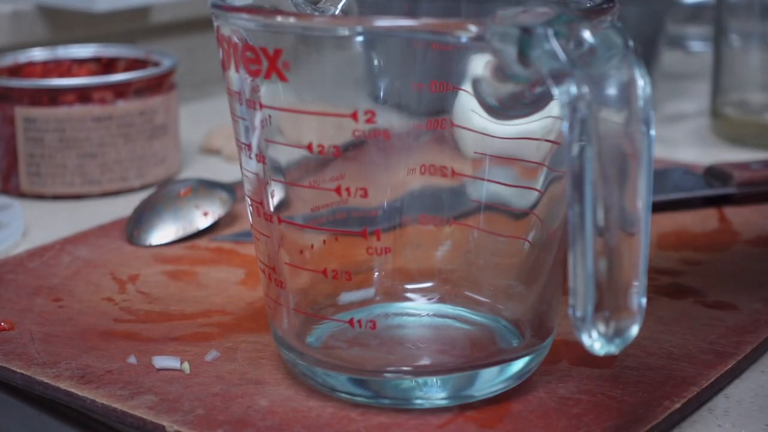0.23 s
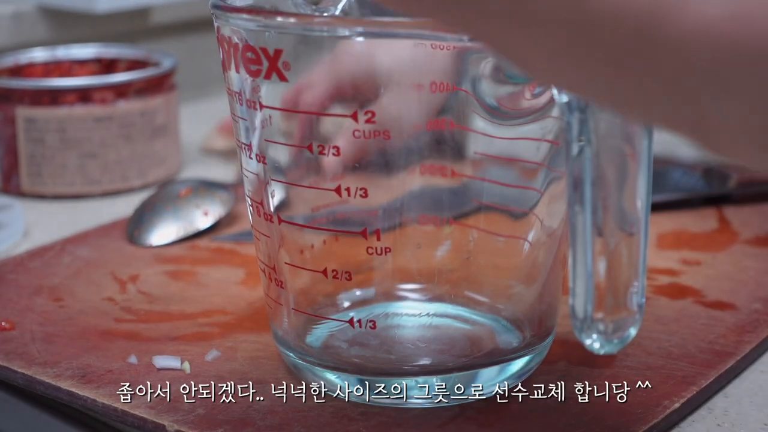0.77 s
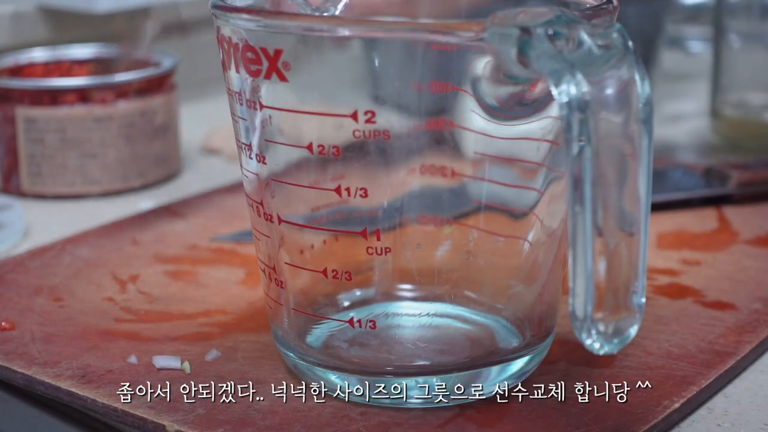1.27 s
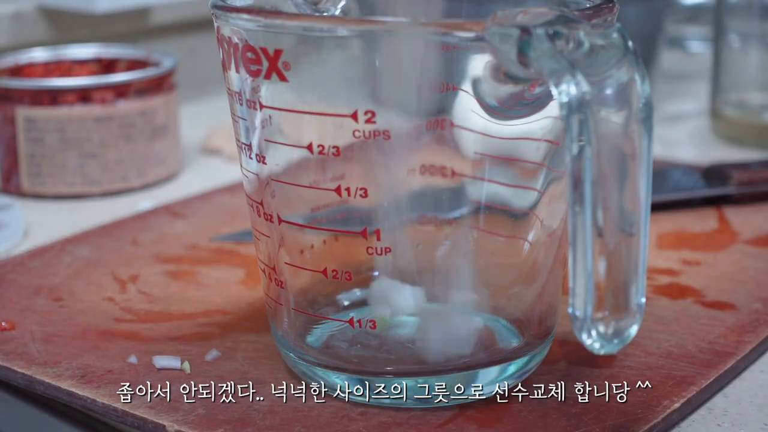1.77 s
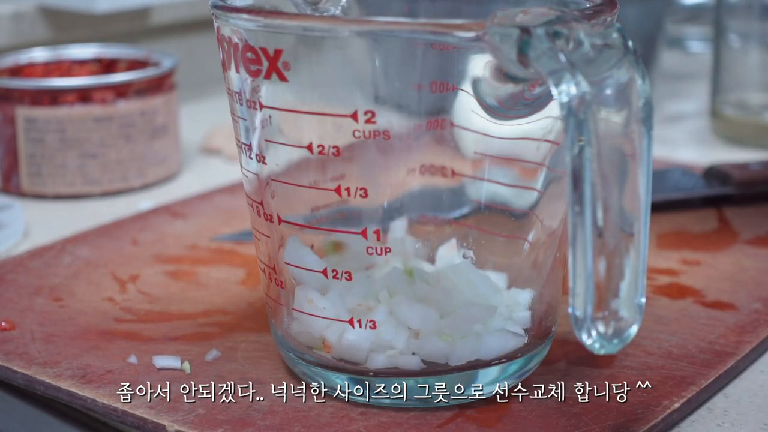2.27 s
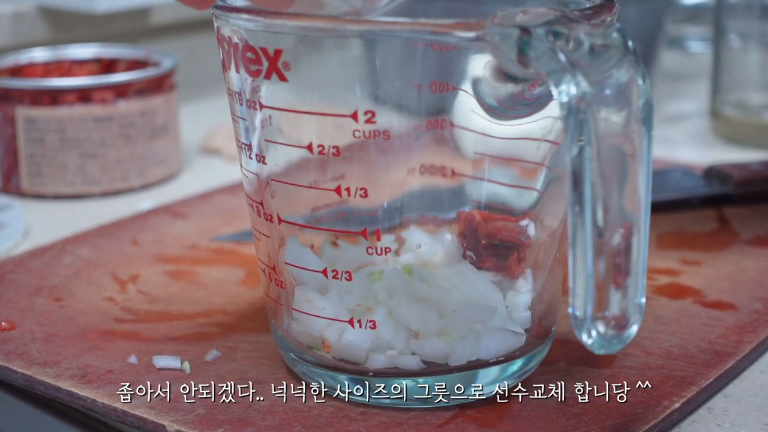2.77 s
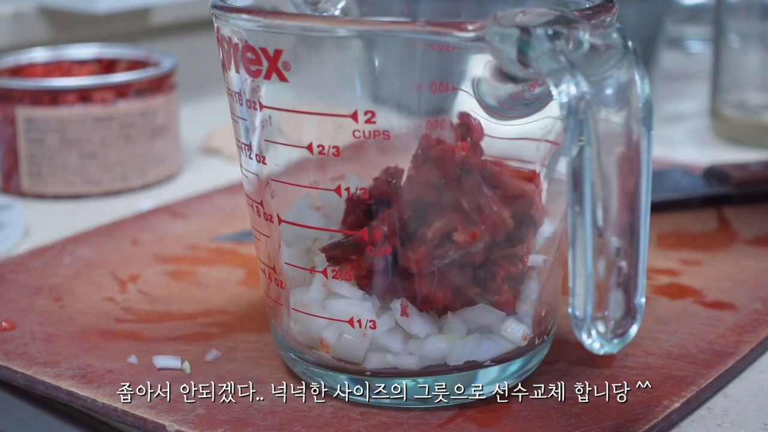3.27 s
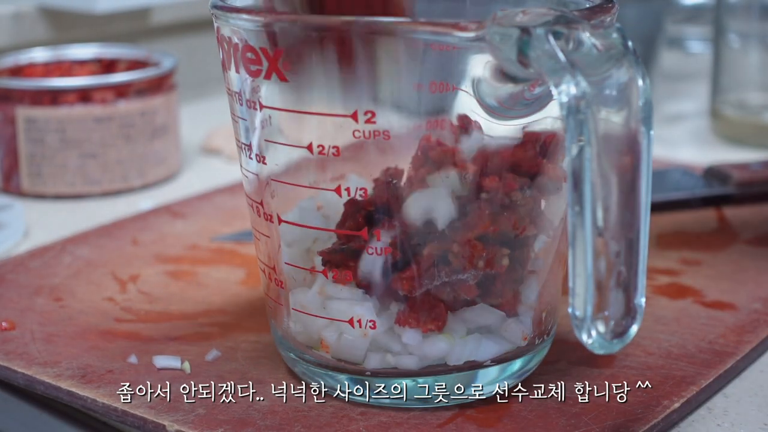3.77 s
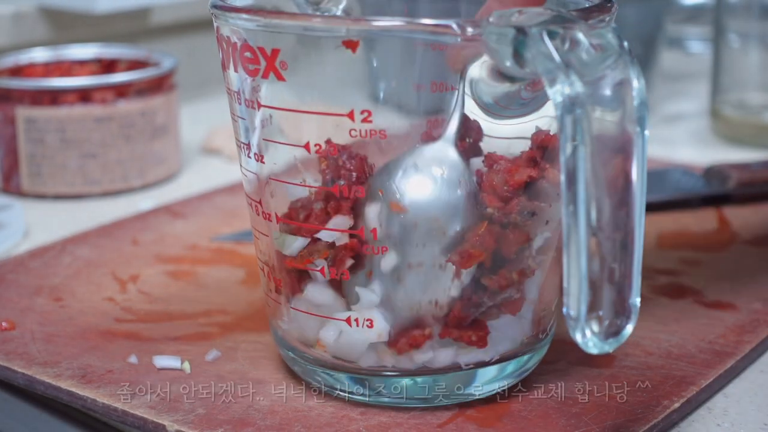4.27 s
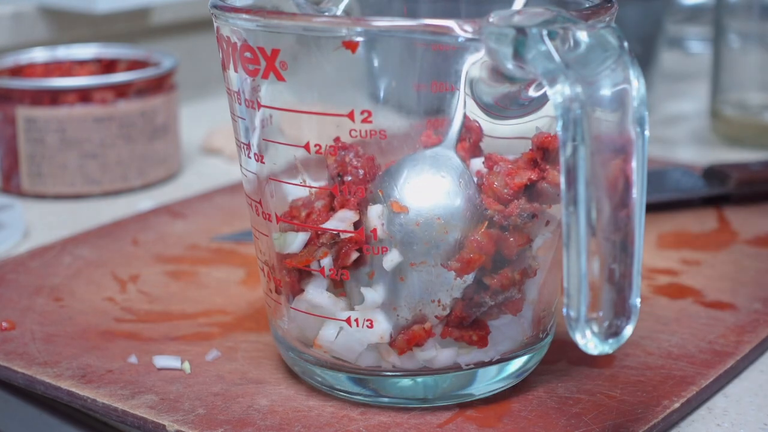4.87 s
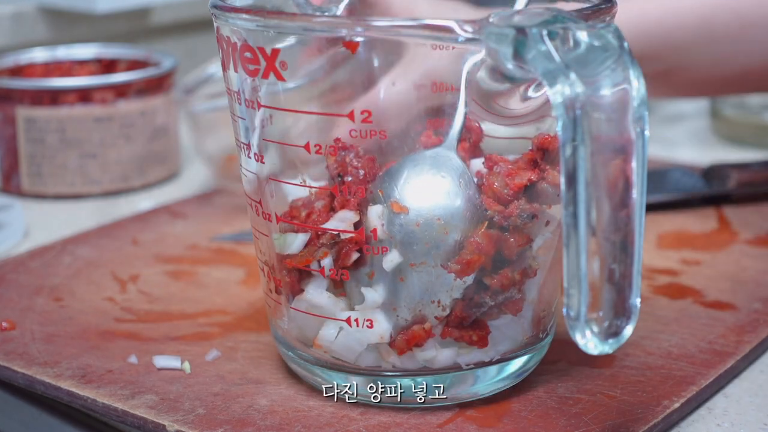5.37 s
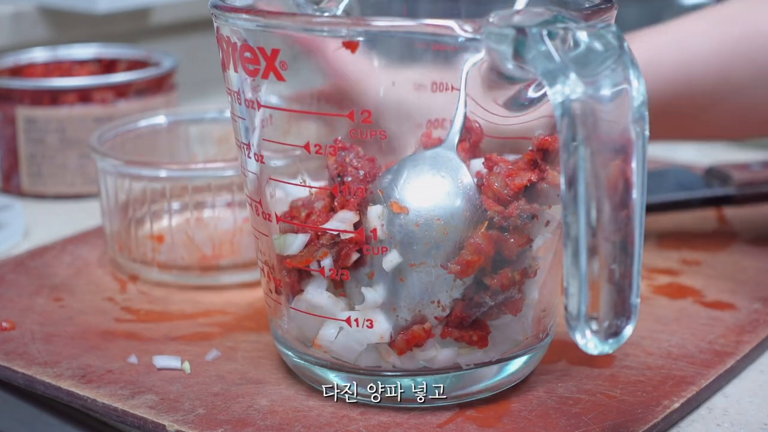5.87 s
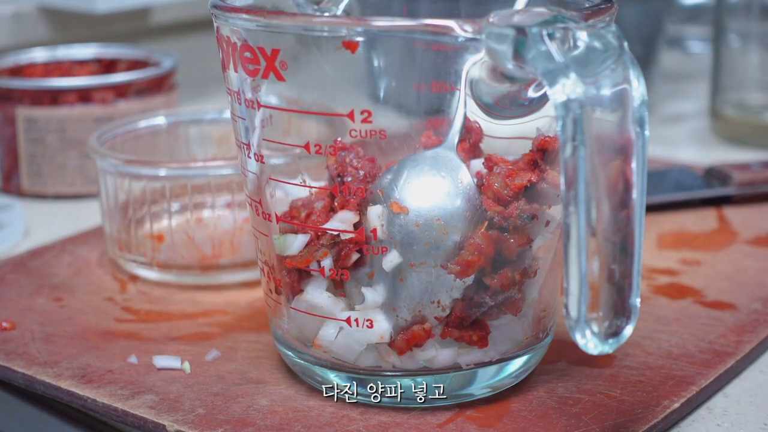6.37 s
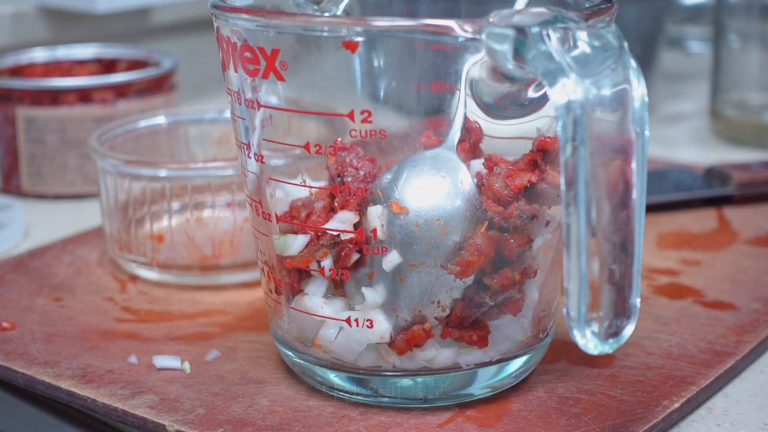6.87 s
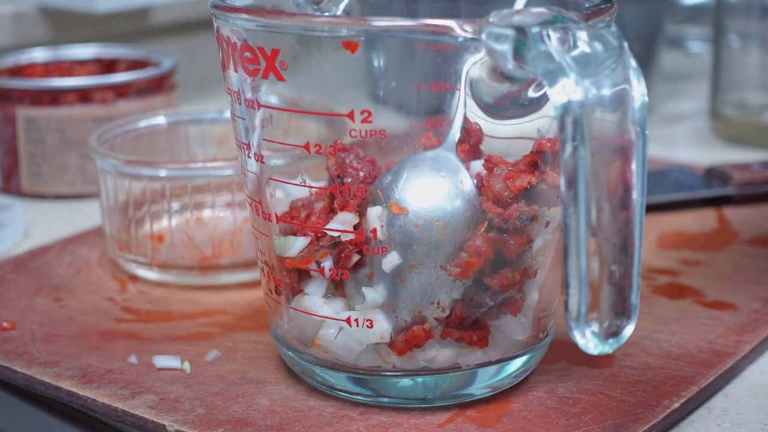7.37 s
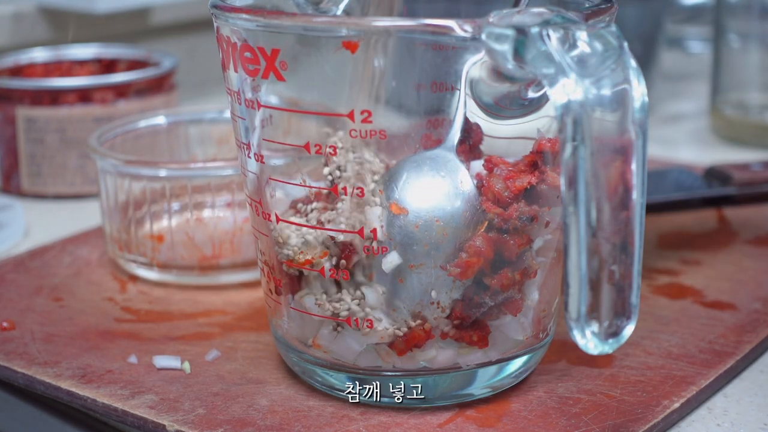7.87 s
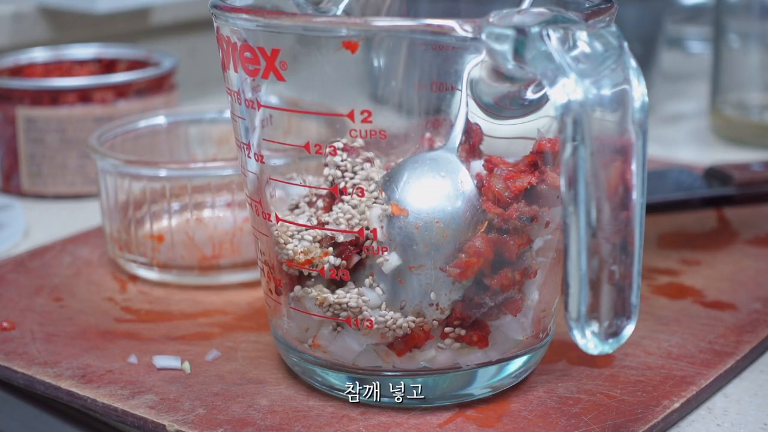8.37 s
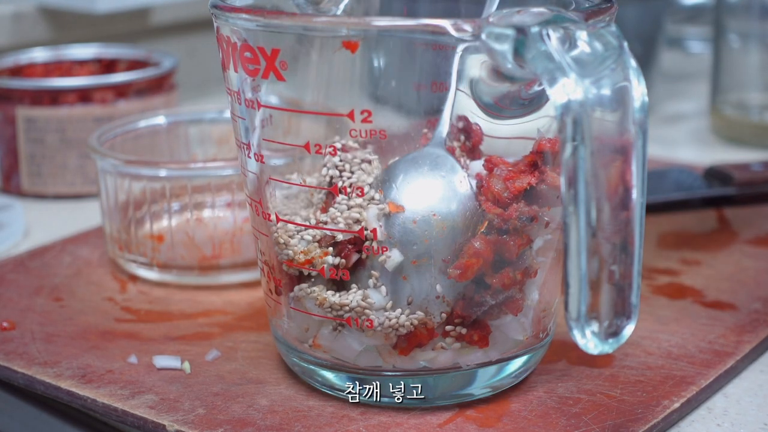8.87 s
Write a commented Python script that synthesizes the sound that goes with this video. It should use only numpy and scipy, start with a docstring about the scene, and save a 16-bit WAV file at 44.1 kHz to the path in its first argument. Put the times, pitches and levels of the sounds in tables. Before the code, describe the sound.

A faint fan murmurs throughout in a small kitchen, with most sounds close by. Around 1 second a steel spoon drags softly off a cutting board and ticks. From 1.7 seconds chopped onion slaps wetly into a glass measuring cup. The spoon clinks at 2.4, then rings loudly against the glass at 2.8 and 3.1. Three quick metallic knocks with squelching paste follow between 3.4 and 3.8. Light ticks lead to another clink at 5.1. At 5.7 a small glass bowl lands loudly on the board and rocks to rest. Further off, a wooden cupboard knocks several times from 6.2, and a drawer rasps and rumbles from 6.6, cutting off abruptly near 7.1. At 7.6 sesame seeds rush from a jar, pattering and tinkling on glass. The jar taps the rim sharply at 8.1 and rubs it at 8.7 while the seeds thin to a trickle.

```python
"""A steel spoon knocks chilli paste off against a glass measuring cup, ringing the modes of both.
The cup stands close by on a cutting board in a small kitchen; a fan murmurs throughout. First the spoon
drags off the board and chopped onion slaps into the cup. After the knocks a small glass bowl rocks to
rest; further off, a wooden cupboard is knocked and a drawer rumbles on its runners. Last, sesame seeds
pour from a jar, their many tiny contacts pattering and tinkling on the glass."""
import sys
import numpy as np
from scipy import signal
from scipy.fft import rfft, irfft
from scipy.io import wavfile
from scipy.ndimage import uniform_filter1d

SR = 44100
rng = np.random.default_rng(int(sys.argv[2]) if len(sys.argv) > 2 else 0)


def put_to_file(sound):
    """Save the sound as 16-bit audio at rate SR, in the file named by the first command-line argument."""
    columns = np.atleast_2d(sound).T  # one column per channel
    safe = np.clip(columns, -1, 1)
    whole_steps = np.round(safe * 32767)
    wavfile.write(sys.argv[1], SR, whole_steps.astype(np.int16))


N = 401751
T = np.arange(N) / SR
AGE_S = T[:SR * 3 // 4]  # time since a blow


def undb(db):
    """Decibels to gain."""
    return 10 ** (np.asarray(db) / 20)


def unit(x):
    """Scale to rms 1."""
    return x / np.sqrt(np.mean(x ** 2))


def fade(t60_s):
    """Exponential decay after a blow."""
    return np.exp(-np.log(1000) * AGE_S / max(t60_s, 1 / SR))


def add(track, at_s, sound):
    """Mix a sound in at `at_s`."""
    start = max(int(at_s * SR), 0)
    track[start:start + len(sound)] += sound[:N - start]


def colour(x, points):
    """Filter by a (frequency [Hz], level [dB]) curve; rms 1."""
    hz, db = np.transpose(points)
    bins_hz = np.maximum(np.arange(len(x) // 2 + 1) * SR / len(x), 1)
    gain = undb(np.interp(np.log(bins_hz), np.log(hz), db))
    return unit(irfft(rfft(x) * gain, len(x)))


def swell(peak_s, db, rise_s, fall_s, hold_s=0, sag_db_per_s=0):
    """Envelope: 60 dB rise to the peak, sagging hold, 60 dB fall."""
    early = np.maximum(peak_s - T, 0) / rise_s
    late = np.maximum(T - peak_s - hold_s, 0) / fall_s
    sag_db = sag_db_per_s * np.clip(T - peak_s, 0, hold_s)
    return undb(db - sag_db - 60 * (early + late))


def walk(rate_hz):
    """Smooth random drift; rms 1."""
    step = int(SR / rate_hz)
    stairs = np.repeat(rng.standard_normal(N // step + 1), step)
    return unit(uniform_filter1d(stairs, step)[:N])


def ring(modes, tilt_db_oct=0, detune=0.00032, rise_cycles=0.083, scatter_db=1.8):
    """Decaying modes; hard contact tilts them to the treble, spot and grip vary per blow."""
    out = 0
    for k, (hz, db, t60_s) in enumerate(modes):
        pitch, spot = rng.standard_normal(2)
        wave = (-1) ** k * np.sin(2 * np.pi * hz * (1 + detune * pitch) * AGE_S)
        attack = 1 - np.exp(-AGE_S * hz / rise_cycles)
        gain = undb(db + tilt_db_oct * np.log2(hz / 4000) + scatter_db * spot)
        out = out + gain * wave * attack * fade(t60_s)
    # a small body radiates little below its lowest mode
    return signal.sosfilt(signal.butter(2, modes[0][0] / 2, "high", fs=SR, output="sos"), out)


def struck(modes, share):
    """Modes for a blow between two contacts: share 0 is the first, 1 the second."""
    return [(hz, a_db + share * (b_db - a_db), t60_s) for hz, a_db, b_db, t60_s in modes]


def band(centre_hz, octaves):
    """Band edges in Hz."""
    low_hz = min(centre_hz / 2 ** (octaves / 2), SR / 4)
    return low_hz, low_hz * 2 ** octaves


def clack(low_hz, high_hz, t60_s, tail_db, tail_t60_s, contact_hz=12500):
    """Contact crack with a tail of dense, damped modes; rms 1 over the first 20 ms."""
    burst = rng.standard_normal(len(AGE_S)) * (fade(t60_s) + undb(tail_db) * fade(tail_t60_s))
    edges_hz = [low_hz, np.clip(high_hz, low_hz + 100, SR / 2 - 100)]
    x = signal.sosfilt(signal.butter(2, edges_hz, "band", fs=SR, output="sos"), burst)
    # finite contact time bounds the treble
    x = signal.sosfilt(signal.butter(2, contact_hz, fs=SR, output="sos"), x)
    return x / np.sqrt(np.mean(x[:SR // 50] ** 2))


def grains(per_s, spread_db, hiss_db):
    """Tiny contacts of uneven size over a hiss; rms 1."""
    size = undb(spread_db * np.minimum(rng.exponential(size=N), 4))
    clicks = (rng.random(N) < per_s / SR) * size * rng.choice([-1, 1], N)
    return unit(unit(clicks) + undb(hiss_db) * rng.standard_normal(N))


def excite(force, modes, tilt_db_oct=0):
    """A body driven by a running force; rms 1."""
    return unit(signal.fftconvolve(force, ring(modes, tilt_db_oct))[:N])


# fan spectrum: (frequency [Hz], level [dB])
FAN_COLOUR = [(15, -57), (25, -30.5), (70, -18.5), (108, -10.5), (200, 0), (463, -9), (911, -9),
              (1160, -9.5), (1560, -8), (2480, -13), (3340, -23.5), (4490, -21.5), (4870, -27),
              (5880, -25.5), (16000, -35)]


def fan(level_db=-59):
    """Air noise, wavering slightly, nearly alike on both sides."""
    mid, side = (colour(rng.standard_normal(N), FAN_COLOUR) for _ in range(2))
    return undb(level_db + 0.13 * walk(2)) * (mid + undb(-7.5) * side * np.array([[1], [-1]]))


# loaded board modes: (frequency [Hz], level [dB], t60 [s])
BOARD_MODES = [(141.5, -1.5, 0.25), (184, -8, 0.17), (225.4, -6.5, 0.24), (385.6, -12, 0.38),
               (412.5, 0.5, 0.05), (594, -7, 0.11), (718, -15, 0.34)]


def board_thud(db):
    """The board takes a weight and rings low."""
    return undb(db) * ring(BOARD_MODES, detune=0.011, rise_cycles=1.5)


# cup nudges: (time [s], level [dB])
NUDGES = [(0.005, -42), (4.245, -43.5)]


def cup_on_board(jolt_s=2.842):
    """The cup is nudged against the board, and jolted by the hardest spoon blow."""
    out = np.zeros(N)
    for at_s, db in NUDGES:
        add(out, at_s, board_thud(db))
    add(out, jolt_s, undb(-33) * clack(260, 640, t60_s=.05, tail_db=6, tail_t60_s=.3))
    return out


# spoon drags: (peak time [s], level [dB])
DRAGS = [(.957, -44), (1.155, -53)]
# drag spectrum: (frequency [Hz], level [dB])
DRAG_COLOUR = [(150, -47), (250, -9), (393, 0), (609, -11.5), (1200, -5.5), (1530, -8), (1660, -4),
               (2340, -12), (5000, -20), (12000, -41), (15600, -72), (22000, -120)]
# dragged spoon modes: (frequency [Hz], level [dB], t60 [s])
DRAG_MODES = [(1720, 6, .04), (3860, -5, 0.11), (5000, 0, 0.25), (7650, -8, .08)]
# spoon ticks: (time [s], level [dB], centre [Hz], tail [dB])
TICKS = [(1.186, -56, 5200, -16), (1.204, -44, 1950, 0), (1.249, -37, 3800, -36), (4.991, -43.5, 5200, -17)]


def spoon_handling():
    """The spoon drags off the board, ticks as it is picked up, and later ticks sharply on the cup."""
    friction = grains(1500, 2.5, -2.5)
    pull = sum(swell(peak_s, db, rise_s=.2, fall_s=.18) for peak_s, db in DRAGS)
    out = pull * (colour(friction, DRAG_COLOUR) + undb(-12.5) * excite(friction, DRAG_MODES))
    for at_s, db, hz, tail_db in TICKS:
        tick = clack(*band(hz, octaves=2.1), t60_s=.005, tail_db=tail_db, tail_t60_s=.12)
        add(out, at_s, undb(db) * tick)
    return out


# onion landings: (time [s], slap [dB], slap centre [Hz], weight [dB])
ONION_DROPS = [(1.728, -31, 4100, -49), (1.819, -52, 2600, -44), (1.954, -41, 2600, -47.5),
               (1.984, -43.5, 5200, -57), (2.036, -50, 2400, -56), (2.095, -45, 4800, -62)]
# wet patter spectrum: (frequency [Hz], level [dB])
ONION_COLOUR = [(240, -32), (400, -5), (536, -12), (753, -1.5), (1310, -14), (1490, -29), (2320, -1.5),
                (2670, -26), (3070, -10), (3530, -16.5), (4950, -17.5), (9760, -23), (16000, -29)]
# spectrum of onion bits or seeds on glass: (frequency [Hz], level [dB])
GRAIN_COLOUR = [(590, -50), (1000, -31), (1310, -16), (1690, -24), (2590, -1), (2940, -21), (3800, -5),
                (4120, -3), (4360, -3), (6040, -9.5), (7530, 0.5), (8450, -9), (9940, -2.5), (14600, -15),
                (16000, -19)]


def onion():
    """Wet onion slaps and patters into the cup, then settles with ticks; the board takes the weight."""
    patter = colour(grains(500, 3.5, -6), ONION_COLOUR)
    slips = colour(grains(120, 3, -14), GRAIN_COLOUR)
    settling = swell(ONION_DROPS[-1][0], db=-58.5, rise_s=.6, fall_s=1.8)
    out = settling * (patter + undb(-4) * slips)
    for at_s, slap_db, hz, weight_db in ONION_DROPS:
        out += swell(at_s, weight_db, rise_s=.01, fall_s=.46) * patter
        slap = clack(*band(hz, octaves=2.3), t60_s=.007, tail_db=-12, tail_t60_s=.12)
        add(out, at_s, undb(slap_db) * slap + board_thud(weight_db + 4.5))
    return out


# cup modes: (frequency [Hz], rim blow [dB], wall blow [dB], t60 [s])
CUP_MODES = [(1284, 4.5, -14, 0.18), (1314.5, -5, -1.5, 0.075), (3316, -5, -17.5, 0.28),
             (3720, -9, 5.5, 0.094), (4370, -29.5, -16, .15), (5380, -11, -16, .29),
             (5890, -40.5, -11, .14), (6370, -23.5, -9.5, 0.15), (7279, -27.5, -22.5, 0.25),
             (7492, -23, 0.5, 0.12), (8020, -22, -5.5, 0.19), (9675, -20.5, -24, 0.14),
             (10100, -31, -29.5, 0.1), (11230, -36, -14, 0.098), (12586, -39.5, -22, 0.043),
             (13700, -39, -25.5, .15)]
# spoon modes: (frequency [Hz], tip blow [dB], edge blow [dB], t60 [s])
SPOON_MODES = [(1943, 0.5, -11, 0.065), (2003, 0.5, -20, 0.18), (2307, -10, -12, .07),
               (2674, -19, -9, 0.027), (2820, -29, -5.5, 0.11), (2930, -20.5, -17.5, .13),
               (4470, -7, -2, 0.105), (4560, 9, -3, 0.05), (5100, -12.5, -12.5, .07),
               (5570, 6.5, -12, 0.045), (7570, 2, -15, 0.1), (7660, -12, -14, .13), (8200, -16, -24, .11),
               (8700, -24.5, -24.5, 0.048), (10630, -27, -22.5, 0.11), (11500, -18.5, -25, 0.11),
               (12400, -32, -29.5, .08), (12850, -28, -29, .08), (13950, -38, -36, .09)]
# spoon blows: (time [s], cup [dB], wall share [0-1], spoon [dB], edge share [0-1], tilt [dB/octave])
CLINKS = [(2.287, -62, .24, -56, .3, -3), (2.442, -44, .6, -23.5, .35, 1.8), (2.511, -62, .3, -37, .74, 1),
          (2.840, -19.5, .15, -20.5, .8, -1.5), (3.011, -67, .7, -38, .6, -8), (3.063, -43, .5, -50, 1, -1),
          (3.099, -19, .11, -24.5, .47, 1), (4.228, -48, .3, -61, .5, 9), (4.357, -52, .74, -74, .5, -2),
          (4.371, -49, .74, -74, .5, -1), (4.569, -73, .6, -59.5, .35, -10),
          (4.917, -45.5, .6, -71.5, .5, -1), (4.991, -64, .5, -46, .4, 2), (5.084, -26, .95, -46, .1, .5),
          (5.106, -38.5, .7, -59, .4, -2)]


def spoon_on_cup():
    """Each blow rings glass and steel according to where it lands; rim blows shake the board most."""
    out = np.zeros(N)
    for at_s, cup_db, wall, spoon_db, edge, tilt_db_oct in CLINKS:
        glass = undb(cup_db) * ring(struck(CUP_MODES, wall), tilt_db_oct)
        steel = undb(spoon_db) * ring(struck(SPOON_MODES, edge), tilt_db_oct)
        force = np.hypot(undb(cup_db), undb(spoon_db))
        crack_hz = 3100 * 2 ** (.08 * tilt_db_oct)
        crack = clack(*band(crack_hz, octaves=1.8), t60_s=.033, tail_db=-19.5, tail_t60_s=.12)
        thud = board_thud(cup_db - 21) * (1 - .65 * wall)
        add(out, at_s, glass + steel + force * undb(-12) * crack + thud)
    return out


# loaded spoon knocks:
# (time [s], skid [s], strike [dB], slap [dB], ring [dB], ring edge share [0-1], paste [dB])
PASTE_KNOCKS = [(3.425, .005, -21, -27, -27, .8, -31.5), (3.639, .3, -25, -28, -22, 1, -49),
                (3.781, .07, -19, -34, -25.5, .05, -60)]
# squelch spectrum: (frequency [Hz], level [dB])
PASTE_COLOUR = [(350, -44.5), (600, -13), (1280, 1), (4170, -12.5), (4590, -11), (4770, -15), (7750, -11.5),
                (12800, -28), (14400, -36.5), (15000, -81)]


def paste_knocks(skid_db=-37, slap_delay_s=.005):
    """The loaded spoon skids on the rim, strikes edge-on and slaps flat; the paste squelches off."""
    out = np.zeros(N)
    edge_modes = struck(SPOON_MODES, 0.85)
    chatter = excite(grains(700, 2.5, -12), edge_modes, tilt_db_oct=2)
    squelch = colour(grains(900, 2.6, -3), PASTE_COLOUR)
    for at_s, skid_s, strike_db, slap_db, ring_db, edge, paste_db in PASTE_KNOCKS:
        slap_s = at_s + slap_delay_s
        out += swell(at_s, skid_db, skid_s, fall_s=.04) * (chatter + undb(-6) * squelch)
        out += swell(slap_s, paste_db, rise_s=.02, fall_s=.48) * (squelch + undb(-5.5) * chatter)
        steel = ring(edge_modes, tilt_db_oct=1)
        glass = undb(-18) * ring(struck(CUP_MODES, 0.2), tilt_db_oct=1.5)
        crack = undb(-16) * clack(3500, 11000, t60_s=.033, tail_db=-19, tail_t60_s=.12)
        add(out, at_s, undb(strike_db) * (steel + glass + crack))
        slap = undb(slap_db) * clack(*band(2500, octaves=1.5), t60_s=.016, tail_db=-17, tail_t60_s=.12)
        slap_ring = undb(ring_db) * ring(struck(SPOON_MODES, edge), tilt_db_oct=-1.5)
        add(out, slap_s, slap + slap_ring + board_thud(paste_db - 15))
    return out


# bowl modes: (frequency [Hz], level [dB], t60 [s])
BOWL_MODES = [(1992, -1, .5), (2810, -3, .36), (3187, -2, .18), (3451, -5, .29), (4600, -3, .16),
              (4953, -3, .15), (5690, 0, .25), (6665, -12, .45), (8662, -11, .23), (9663, -11, .19),
              (10460, -13, .19), (11620, -17, .15)]
# modes of its foot on the board: (frequency [Hz], level [dB], t60 [s])
FOOT_MODES = [(816, -18, 0.02), (906, -7, .03), (1250, 1, 0.021), (1357, 1.5, 0.05), (1390, 7, 0.0088),
              (1760, 1, 0.041), (1990, 5, 0.018)]
# landings on each side of the foot: (time [s], level [dB], tick [dB])
ROCKS = [(5.6677, -16.5, -35), (5.7051, -15.5, -56)]


def bowl(rebound_s=.019, rebound_db=-4, settle_s=5.811):
    """The bowl rocks on its foot, rebounds once per side and settles with a glassy clash."""
    out = np.zeros(N)
    for at_s, db, tick_db in ROCKS:
        add(out, at_s, undb(tick_db) * clack(1500, 3940, t60_s=.004, tail_db=-30, tail_t60_s=.092))
        for bounce in range(2):
            rumble = undb(-10) * clack(520, 1570, t60_s=.01, tail_db=-3, tail_t60_s=.32)
            landing = ring(FOOT_MODES, detune=0.032) + rumble + board_thud(-28)
            add(out, at_s + bounce * rebound_s, undb(db + bounce * rebound_db) * landing)
    glass = undb(-31) * ring(BOWL_MODES)
    clash = undb(-23) * clack(2000, 9100, t60_s=.035, tail_db=5, tail_t60_s=.16)
    knock = undb(-25.5) * clack(600, 3000, t60_s=.028, tail_db=9, tail_t60_s=.13)
    add(out, settle_s, glass + clash)
    add(out, settle_s + .004, knock + board_thud(-41))
    return out


# cupboard modes: (frequency [Hz], door knock [dB], shelf knock [dB], t60 [s])
CUPBOARD_MODES = [(147.7, -6.5, -12.5, 0.33), (209, -19.5, -17, 0.22), (419, -22, 6, 0.1),
                  (494, -11, -15, 0.2), (534, -7.5, -9, .12), (1109, 1, 2, 0.035), (1411, -17, 7, 0.035),
                  (1695, 5, -25, 0.03), (2310, 3.5, -29, 0.018)]
# cupboard knocks: (time [s], ring [dB], shelf share [0-1], clack [dB], clack centre [Hz])
CUPBOARD_KNOCKS = [(6.162, -36, .62, -43, 1800), (6.180, -25, .35, -32.5, 2700),
                   (6.283, -23.5, 0, -30.5, 2800), (6.301, -25, .76, -36, 1150),
                   (6.339, -27.5, .1, -45, 2500), (6.378, -41, 1, -32, 450), (6.403, -28, 1, -40.5, 1600),
                   (6.510, -58, .5, -48, 3500), (6.985, -55, .5, -45, 2400)]


def cupboard():
    """Knocks on door and shelf ring the hollow wood."""
    out = np.zeros(N)
    for at_s, ring_db, shelf, clack_db, hz in CUPBOARD_KNOCKS:
        wood = ring(struck(CUPBOARD_MODES, shelf), detune=0.014, rise_cycles=0.9)
        contact = clack(*band(hz, octaves=2.8), t60_s=.041, tail_db=-7, tail_t60_s=.11)
        add(out, at_s, undb(ring_db) * wood + undb(clack_db) * contact)
    return out


# drawer jerks: (peak time [s], level [dB])
JERKS = [(6.607, -42), (6.648, -28), (6.708, -28)]
# rasp spectrum: (frequency [Hz], level [dB])
RASP_COLOUR = [(250, -25), (650, 1), (2500, 0), (4500, -7), (8000, -22), (16000, -42)]
# runner spectrum: (frequency [Hz], level [dB])
RUNNER_COLOUR = [(29, -59), (50, -36), (105, -13.5), (272, 1), (322, -10), (371, 1), (408, -5.5),
                 (742, -3.5), (1350, -7), (1480, -10.5), (1790, -9), (3670, -18.5), (3940, -21),
                 (7510, -34.5), (15000, -55)]


def drawer():
    """The drawer jerks free with a rasp, then rumbles along its runners, slowing a little."""
    rumble = colour(grains(900, 1.1, -1), RUNNER_COLOUR)
    rasp = colour(grains(600, 1.5, -2), RASP_COLOUR)
    jerks = sum(swell(peak_s, db, rise_s=.09, fall_s=.17) for peak_s, db in JERKS)
    glide = swell(6.7, db=-39, rise_s=.1, fall_s=.1, hold_s=.37, sag_db_per_s=9)
    flutter = undb(1.3 * walk(45))
    return flutter * (glide * rumble + jerks * (undb(-10) * rumble + undb(-4.5) * rasp))


# tilted jar modes: (frequency [Hz], level [dB], t60 [s])
JAR_MODES = [(4470, 2, .03), (4760, -5, 0.038), (7030, -4, .04), (7300, -8, 0.026), (9000, -7, .015),
             (10400, -2, 0.01), (13500, -6, .012)]
# sliding seed spectrum: (frequency [Hz], level [dB])
SLIDE_COLOUR = [(1760, -73), (3000, -50), (3200, -39), (3450, -45), (3750, -40), (4290, -24), (5880, -23),
                (6220, -12.5), (6570, -8), (6710, 2.5), (7890, -18), (9070, -5), (9940, -15),
                (13800, -20.5), (16000, -34)]


def sesame_in_jar(first_slip_s=7.156, spill_s=7.61):
    """Seeds slip and creep in the tilted jar, then spill in one rush."""
    slide = colour(grains(5000, 2.5, 0), SLIDE_COLOUR)
    rush = swell(spill_s, db=-32.5, rise_s=.012, fall_s=.33, hold_s=.035)
    creep = swell(spill_s, db=-60, rise_s=1.7, fall_s=.4) * undb(2 * walk(30))
    jar = excite(grains(3000, 1.8, 5), JAR_MODES)
    out = rush * slide + creep * (undb(-2) * jar + undb(-2.5) * slide)
    add(out, first_slip_s, undb(-53) * ring(JAR_MODES))
    return out


# jar shakes that free more seeds: (peak time [s], level [dB])
SHAKES = [(8.245, -53), (8.385, -51.5)]


def sesame_in_cup(landing_s=7.71):
    """Seeds land and thin to a trickle; their brief contacts ring the cup's high modes most."""
    patter = colour(grains(1400, 3, -7), GRAIN_COLOUR)
    tinkle = excite(grains(900, 3.6, -22), struck(CUP_MODES, 0.6), tilt_db_oct=11)
    landing = swell(landing_s, db=-40, rise_s=.33, fall_s=.55)
    trickle = swell(landing_s, db=-56.5, rise_s=.33, fall_s=1.8, hold_s=1.22) * undb(1.2 * walk(16))
    shakes = sum(swell(peak_s, db, rise_s=.25, fall_s=.3) for peak_s, db in SHAKES)
    return (landing + trickle + shakes) * (patter + undb(-4.5) * tinkle)


# modes of the cup with the jar on its rim: (frequency [Hz], rubbed [dB], tapped [dB], t60 [s])
RIM_MODES = [(1316, -12, -15.5, 0.07), (1770, -16, -16.5, 0.051), (3110, -5.5, -12, 0.056),
             (3400, -6, -9, 0.066), (3790, 1.5, 5, 0.043), (3935, -18, 3, 0.026), (4420, -1.5, -7, 0.053),
             (4580, -6, -8, 0.051), (5413, -15, -8, 0.22), (5850, -12, -14, 0.07), (6355, -9, -15.5, .11),
             (7130, -14, -5, 0.059), (7250, -19, -13, 0.076), (7360, -12, -6, .09), (8650, -19, -22, 0.043),
             (10400, -24, -13, 0.082), (11400, -34, -13, 0.089), (12586, -32, -10, 0.06),
             (13400, -32, -11, 0.059)]
# jar taps: (time [s], ring [dB], clack [dB], clack centre [Hz])
JAR_TAPS = [(8.096, -18.5, -29.5, 5600), (8.242, -65, -49, 7500), (8.480, -54, -52.5, 3000)]


def jar_on_rim():
    """The jar taps the cup's rim and rubs along it, ringing the glass."""
    rub = swell(8.708, db=-35.5, rise_s=.27, fall_s=.24)
    out = rub * excite(grains(700, 1.3, -10), struck(RIM_MODES, 0))
    for at_s, ring_db, clack_db, hz in JAR_TAPS:
        glass = ring(struck(RIM_MODES, 1))
        contact = clack(*band(hz, octaves=2.1), t60_s=.013, tail_db=4, tail_t60_s=.15)
        add(out, at_s, undb(ring_db) * glass + undb(clack_db) * contact)
    return out


def kitchen(x, wet_db, pan_db, side_db, t60_s=0.53, treble_t60_s=0.31):
    """Direct sound plus the short stereo tail of a small, hard room."""
    noise = rng.standard_normal((2, len(AGE_S)))
    low = signal.sosfilt(signal.butter(1, 3000, fs=SR, output="sos"), noise)
    tail = (low * fade(t60_s) + (noise - low) * fade(treble_t60_s)) * (1 - fade(0.013))
    tail /= np.sqrt(np.sum(tail[0] ** 2))
    mid, side = signal.fftconvolve(x[None], tail, axes=1)[:, :N]
    stereo = x + undb(wet_db) * (mid + undb(side_db) * side * np.array([[1], [-1]]))
    return stereo * undb(np.array([[pan_db], [-pan_db]]) / 2)


def scene(cut_s=7.073):
    """Near sounds are drier than far; an abrupt edit cuts off the drawer's rumble and its room tail."""
    spoon = spoon_on_cup() + paste_knocks()
    sesame = sesame_in_jar() + sesame_in_cup() + jar_on_rim()
    near = kitchen(cup_on_board() + onion(), wet_db=-10, pan_db=.5, side_db=-7.5)
    near += kitchen(spoon_handling(), wet_db=-19, pan_db=0, side_db=-3)
    near += kitchen(spoon, wet_db=-7.5, pan_db=.6, side_db=-6.5, t60_s=.33, treble_t60_s=.23)
    near += kitchen(bowl(), wet_db=-8.5, pan_db=1, side_db=-6.5, t60_s=.47)
    near += kitchen(sesame, wet_db=-14, pan_db=.7, side_db=-1.5)
    far = kitchen(cupboard() + drawer(), wet_db=-5.5, pan_db=-1.3, side_db=-9, t60_s=.36)
    return near + far * (T < cut_s) + fan()


def record(dry):
    """Steep low-pass at 16 kHz."""
    return signal.sosfilt(signal.ellip(8, .2, 70, 16000, fs=SR, output="sos"), dry)


dry = scene()
out = record(dry)
put_to_file(out)
```